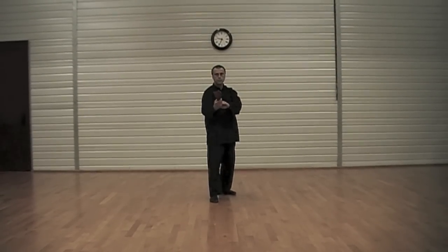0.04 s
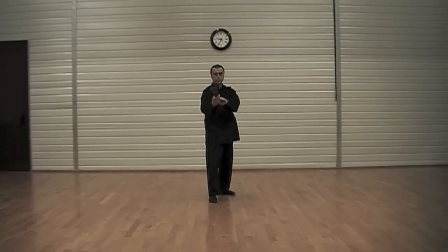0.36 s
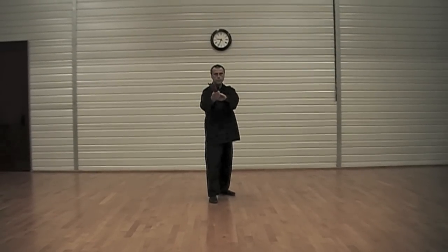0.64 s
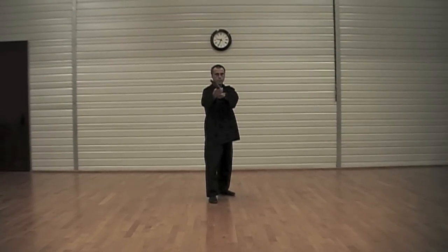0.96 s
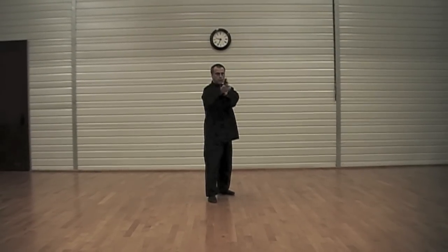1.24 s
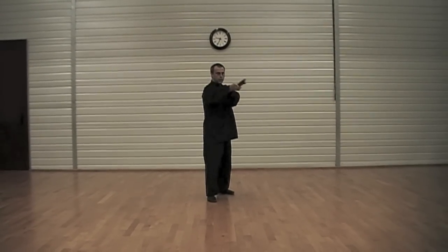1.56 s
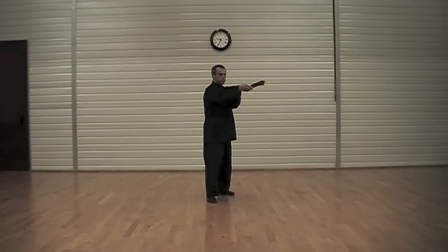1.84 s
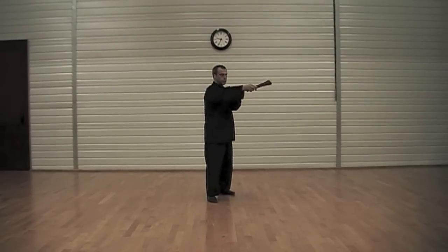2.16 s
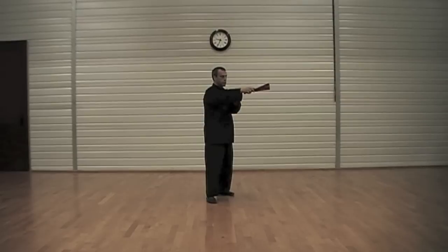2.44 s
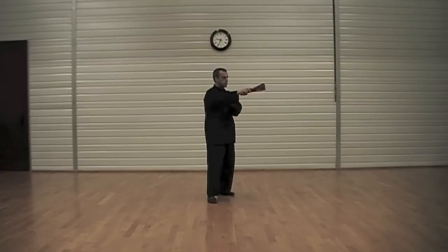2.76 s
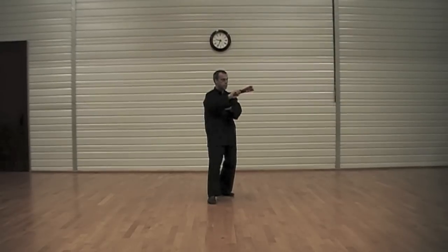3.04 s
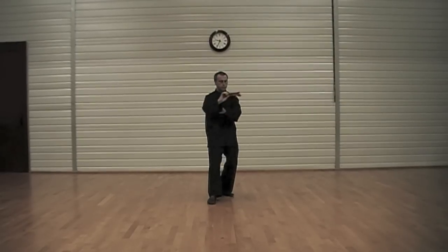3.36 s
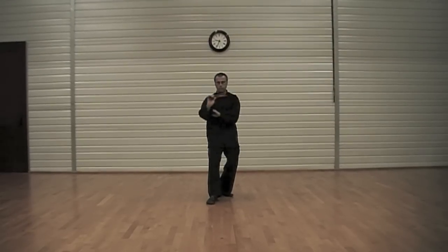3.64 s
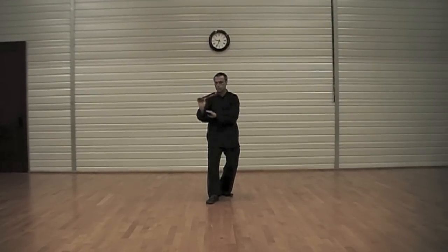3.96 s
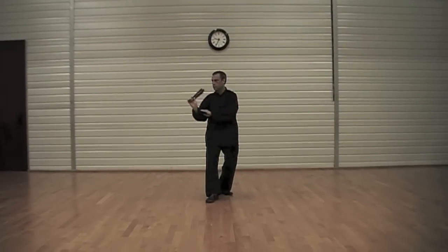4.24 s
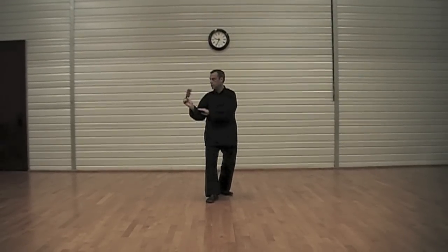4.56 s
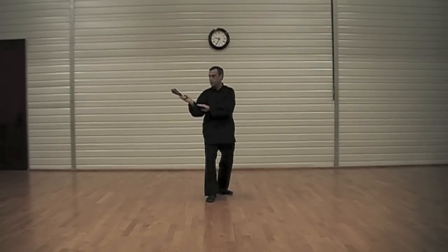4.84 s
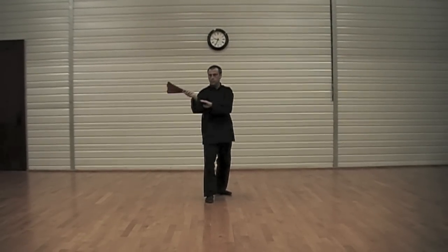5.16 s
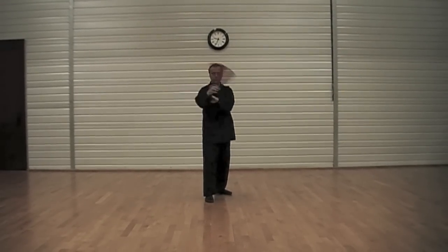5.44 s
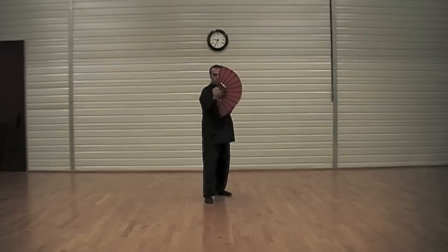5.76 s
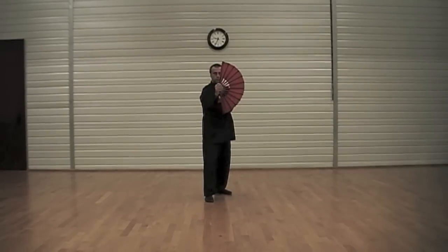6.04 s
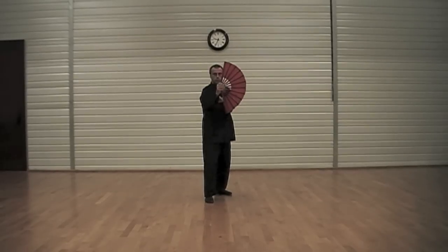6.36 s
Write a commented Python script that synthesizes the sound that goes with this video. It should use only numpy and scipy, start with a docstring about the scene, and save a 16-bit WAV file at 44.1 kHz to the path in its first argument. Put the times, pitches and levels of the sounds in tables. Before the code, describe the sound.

Over steady hiss, faint cloth movement and bamboo rib ticks lead to one loud fan snap that rings through a large hall.

```python
"""A large, quiet sports hall: hiss and a camera's faint whine, then soft steps and swishing sleeves.
A folded cloth fan is swung, its bamboo ribs ticking and sliding. At about 5.6 s it is flicked open:
the pleats jerk taut one after another in under a tenth of a second, the ribs crack, and the sheet
pushes a low puff of air. Gain control ducks under the crack, so the echo swells up afterwards
as the hall rings on."""
import sys
import numpy as np
from scipy import signal
from scipy.fft import rfft, irfft
from scipy.io import wavfile
from scipy.ndimage import uniform_filter1d, minimum_filter1d

SR = 44100
rng = np.random.default_rng(int(sys.argv[2]) if len(sys.argv) > 2 else 0)


def unload_wav(signal):
    """Save mono or channel-first audio to the path in sys.argv[1] as 16-bit WAV at rate SR, clipped to [-1, 1]."""
    wavfile.write(
        sys.argv[1],
        SR,
        np.round(np.clip(np.atleast_2d(signal).T, -1, 1) * 32767).astype(np.int16),
    )


N = 282681


def from_db(db):
    return 10 ** (np.asarray(db) / 20)


def at_hz(points, hz):
    """Read a curve on a log-frequency axis."""
    table = np.array(points)
    return np.interp(np.log(hz + 1e-9), np.log(table[:, 0]), table[:, 1])


def butter(x, hz, kind, order):
    return signal.sosfilt(signal.butter(order, min(hz, SR / 2 - 1), kind, fs=SR, output="sos"), x + 1e-18)


def noise(spectrum):
    """Coloured noise of rms 1."""
    colour = from_db(at_hz(spectrum, np.fft.rfftfreq(N, 1 / SR)))
    x = irfft(rfft(rng.standard_normal(N)) * colour, N)
    return x / x.std()


def stereo_noise(spectrum, likeness, size):
    """Spectra of two noises that are alike to a degree set by frequency."""
    hz = np.fft.rfftfreq(size, 1 / SR)
    alike = at_hz(likeness, hz)
    mid, side = rfft(rng.standard_normal((2, size))) * from_db(at_hz(spectrum, hz))
    return hz, np.sqrt(1 + alike) * mid + np.sqrt(1 - alike) * side * [[1], [-1]], alike


def clicks(times, levels_db):
    """One impulse for each contact."""
    out = np.zeros(N)
    out[np.round(np.asarray(times) * SR).astype(int)] = from_db(levels_db)
    return out


def fading(hits, t60):
    """Every hit starts an envelope that falls 60 dB in t60 seconds."""
    return signal.lfilter([1], [1, -np.exp(-np.log(1000) / (t60 * SR))], hits + 1e-18)


def ring(hits, modes):
    """Every hit rings a body's damped modes; neighbouring modes start in opposite directions."""
    t = np.arange(SR // 20) / SR
    body = sum((-1) ** k * from_db(db - 60 * t / t60) * np.sin(2 * np.pi * hz * t)
               for k, (hz, db, t60) in enumerate(modes))
    return signal.oaconvolve(hits, body)[:N]


def swell(start, end, attack_s, release_s, edge_db):
    """Attack, hold from start to end, release; each slope covers edge_db in its time."""
    t = np.arange(N) / SR
    away = np.maximum(start - t, 0) / attack_s + np.maximum(t - end, 0) / release_s
    return from_db(np.maximum(-edge_db * away, -200))


def swinging(moves, attack_share=.35):
    """Envelope of a series of movements, each speeding up to its peak and slowing down."""
    return sum(from_db(db) * swell(s, s, attack_share * length, (1 - attack_share) * length, edge_db=21.5)
               for s, db, length in moves)


# The colour of the noise bed. Each row: frequency in Hz, relative density in dB.
HISS_COLOUR = [(20, -49), (40, -6), (75, -9), (130, -6), (200, 1.5), (300, -2.5), (700, 1.5), (1500, -2.5),
               (2200, -3.5), (3000, -6.5), (5500, -9.5), (7500, -9.5), (11000, -16), (15500, -27)]
# Its stereo image. Each row: frequency in Hz, left-right likeness from -1 to 1.
HISS_IMAGE = [(60, 0.66), (180, -0.45), (500, -0.77), (1600, -0.56), (3000, -0.11), (4500, 0.061),
              (7500, 0.49), (10000, -0.14), (15000, 0.24)]


def hiss(level_db):
    """A wide, steady hiss; the camera body shakes its two microphones against each other."""
    _, field, alike = stereo_noise(HISS_COLOUR, HISS_IMAGE, N)
    bed = irfft(field / np.sqrt(1 + alike), N)
    return from_db(level_db) * bed / bed.std() * from_db([[-.4], [.4]])


# Hum and motor tones. Each row: frequency in Hz, level in dB, the left side's phase lead in radians.
WHINE_TONES = [(99.3, -82.5, 0.94), (206, -83, 1.15), (728, -82, 1.36), (2187.4, -73, 0.86),
               (2950, -89, 2.1), (3645.6, -82.5, 1.8), (7870, -96, 4), (10600, -98, 1)]


def whine():
    """Mains hum and the camera's motor hold thin tones, a little to the right."""
    t = np.arange(N) / SR
    tones = sum(np.sqrt(2) * from_db(db) * np.sin(2 * np.pi * hz * t + np.array([[lead], [0]]))
                for hz, db, lead in WHINE_TONES)
    return tones * from_db([[-1.8], [1.2]])


# The colour of the reverb. Each row: frequency in Hz, relative level in dB.
TAIL_COLOUR = [(60, -21), (150, -14.5), (360, 3), (470, -5.5), (650, -5), (1000, 1.5), (2500, 2.5),
               (5000, 1), (9000, 5.5), (14000, 5)]
# Its stereo image. Each row: frequency in Hz, left-right likeness from -1 to 1.
TAIL_IMAGE = [(100, 0.9), (700, 0.95), (2000, 0.8), (4000, 0.67), (5500, 0.95), (8000, 0.56),
              (10000, -0.053), (15000, -0.95)]
# Its decay. Each row: frequency in Hz, t60 in seconds.
TAIL_DECAY = [(100, 1.3), (350, 1.17), (600, 1.445), (1200, 1.208), (2500, 0.92), (5000, 0.97),
              (8000, 0.72), (12000, 0.65)]
# Pitches of the fan's quick pleat run, emphasised in its echo.
# Each row: frequency in Hz, bandwidth in Hz, gain in dB.
SNAP_PITCHES = [(365, 16, 0), (548, 18, -4), (591, 20, -1), (796, 26, 6), (1113, 28, -4), (1238, 18, -1),
                (1385, 18, -4)]


def hall(x, echo_db=-46.0, predelay_s=0.0019, build_s=0.096):
    """The hall answers with a diffuse tail that builds up, then dies fastest in the treble."""
    t = np.arange(SR) / SR
    hz, field, _ = stereo_noise(TAIL_COLOUR, TAIL_IMAGE, len(t))
    half_octave = np.round(2 * np.log2(np.maximum(hz, 64)))
    tail = sum(irfft(field * (half_octave == k)) * from_db(-60 * t / at_hz(TAIL_DECAY, 2 ** (k / 2)))
               for k in np.unique(half_octave))
    tail *= 1 - np.exp(-np.maximum(t - predelay_s, 0) / build_s)
    pitches = sum(from_db(db) * signal.lfilter(*signal.iirpeak(f, f / width, fs=SR), x)
                  for f, width, db in SNAP_PITCHES)
    return from_db(echo_db) * signal.fftconvolve((x + pitches)[None], tail, axes=1)[:, :N]


# Early reflections. Each row: delay in seconds, gain in dB.
REFLECTIONS = [(.0235, -13), (0.061, -23), (.135, -19.5)]


def wall_returns(sideways):
    """Ceiling and walls each send back the sound thrown their way, later and softer."""
    n = np.arange(N)
    return sum(from_db(db) * np.interp(n - delay_s * SR, n, x, left=0)
               for x, (delay_s, db) in zip(sideways, REFLECTIONS))


# Footfalls. Each row: start in seconds, centre frequency in Hz, level in dB, t60 in seconds.
FOOTFALLS = [(.239, 460, -60, .1), (2.639, 1800, -67, .3), (4.799, 140, -67, .45)]


def steps():
    """Soft shoes give short, dull scuffs and knocks on the wooden floor."""
    out = np.zeros(N)
    for s, hz, db, t60 in FOOTFALLS:
        scuff = noise([(hz / 4, -25), (hz, 0), (hz * 4, -25), (hz * 20, -60)])
        out += fading(clicks([s], [db]), t60) * scuff
    return out


# Sleeve swishes. Each row: peak time in seconds, level in dB, length in seconds.
SWISHES = [(1.43, -74, 0.82), (2.95, -71, 2.1), (4.1, -72, 0.86)]
# Their soft colour. Each row: frequency in Hz, relative density in dB.
SWISH_COLOUR = [(100, -26), (350, -9), (650, -2.5), (1100, -7), (2200, -18), (8000, -35)]


def sleeves():
    """Cloth brushes on cloth as the body turns."""
    return swinging(SWISHES) * noise(SWISH_COLOUR)


# The cue for the flick: the first pleat moves, and the pull builds until the cloth is taut.
FIRST_PLEAT_S, PULL_ATTACK_S = 5.6298, .016
TAUT_S = FIRST_PLEAT_S + PULL_ATTACK_S

# The low whump under the snap. Each row: frequency in Hz, relative density in dB.
PUFF_COLOUR = [(10, -25), (28, -2), (70, 3), (130, 1), (210, 5), (400, -18), (1000, -45), (4000, -90)]


def air_puff(level_db=-26.5):
    """The opening sheet gives one push of air, strongest when the cloth first comes taut."""
    push = swell(TAUT_S, TAUT_S, attack_s=0.018, release_s=0.14, edge_db=56)
    return from_db(level_db) * push * noise(PUFF_COLOUR)


# Rib ticks, the light ones thinner. Each row: start in seconds, level in dB, low cut in Hz.
RIB_TICKS = [(.664, -60, 3800), (1.677, -64, 3000), (3.024, -59, 5000), (4.69, -63, 4970),
             (5.182, -53.5, 5540), (5.377, -50, 4970), (5.543, -52, 5420), (5.603, -43, 2140),
             (5.6198, -23.5, 1650)]
# Arm swings that slide the ribs. Each row: peak time in seconds, level in dB, length in seconds.
ARM_SWINGS = [(1.667, -70.5, 0.2), (2.66, -69, 0.17), (4.1, -75, 2.9), (5.117, -66, 0.76),
              (5.586, -63, 0.11)]
# The bright rasp of rib on rib. Each row: frequency in Hz, relative density in dB.
FRICTION_COLOUR = [(100, -20), (500, -10), (1500, 1), (4000, -4), (5500, -3), (7200, 1.5), (9500, -5),
                   (12000, -17), (15500, -37)]


def fan_handling(tick_t60=0.027, grain_db=3, spread_db=-17.5):
    """The folded ribs tick, slide with every swing of the arm, and rub hard as the fan spreads."""
    pleat_s, _, _ = pleat_run()
    spreading = from_db(spread_db) * swell(TAUT_S, pleat_s[-1], attack_s=.053, release_s=.02, edge_db=109)
    friction = noise(FRICTION_COLOUR)
    ticks = sum(butter(fading(clicks([s], [db]), tick_t60) * friction, hz, "high", order=2)
                for s, db, hz in RIB_TICKS)
    catching = butter(rng.standard_normal(N), 280, "low", order=2)   # the ribs catch and slip
    grain = from_db(grain_db * catching / catching.std())
    return ticks + (swinging(ARM_SWINGS) + spreading) * grain * friction


# Accents: the nearest rib stops harder than the rest. Each row: time in seconds, boost in dB.
RIB_ACCENTS = [(5.647, 10.5), (5.668, 5), (5.692, 11.5), (5.698, 4)]


def pleat_run(count=11, first_gap_s=.00822, gap_shrink_s=.000293, slap_db=4.5, crack_db=4):
    """The pleats jerk taut in a quickening run; gives each one's time, cloth level and rib level."""
    k = np.arange(count)
    elapsed = k * first_gap_s - gap_shrink_s * k * (k - 1) / 2
    pleat_s = FIRST_PLEAT_S + elapsed
    pull_db = -34.5 * np.maximum(1 - (elapsed / PULL_ATTACK_S) ** 2, 0)   # the pull builds up
    fade_db = -14 * np.maximum(2 * elapsed / elapsed[-1] - 1, 0) ** 2   # the last pleats slap weakly
    rib_db = crack_db + pull_db
    for when, boost_db in RIB_ACCENTS:
        rib_db[np.abs(pleat_s - when).argmin()] += boost_db
    return pleat_s, slap_db + pull_db + fade_db, rib_db


# Taut cloth, the body of the snap. Each row: frequency in Hz, relative level in dB, t60 in seconds.
CLOTH_MODES = [(599, -5.5, 0.02), (832, -6, 0.015), (1160, -2.5, 0.0071), (1976, -8, 0.0091)]
# Bamboo ribs, its hard edge. Each row: frequency in Hz, relative level in dB, t60 in seconds.
BAMBOO_MODES = [(1555, -0.5, 0.0016), (2190, -2.5, 0.0033), (3210, -2.5, 0.0014), (5560, -7, 0.0016),
                (6620, -7.5, 0.0014), (8480, -6.5, 0.00093), (11900, -22.5, 0.0013)]


def fan_snap(scatter_s, rebound_s=.00135, rebound_db=0.5, flutter_db=-29, chatter_db=-19):
    """Each pleat slaps taut and flutters, and stops its rib with a crack and a brief chatter."""
    pleat_s, cloth_db, rib_db = pleat_run()
    count = len(pleat_s)
    pleat_s = pleat_s + scatter_s * rng.standard_normal(count)   # the paths differ with direction
    again_s = pleat_s + rebound_s * (1 + .07 * rng.standard_normal(count))   # each pleat rebounds once
    slaps = clicks(pleat_s, cloth_db) + clicks(again_s, cloth_db + rebound_db)
    cracks = clicks(pleat_s, rib_db) + clicks(again_s, rib_db + rebound_db)
    flutter = from_db(flutter_db) * fading(slaps, t60=.035) * rng.standard_normal(N)
    chatter = from_db(chatter_db) * fading(cracks, t60=.01) * rng.standard_normal(N)
    snap = ring(slaps + flutter, CLOTH_MODES) + ring(cracks + chatter, BAMBOO_MODES)
    snap = butter(snap, 340, "high", order=2)   # an open sheet radiates little bass
    return butter(snap, 14500, "low", order=4)


def scene():
    """The fan is heard directly; what it throws in other directions comes back from the hall."""
    movement = fan_handling() + steps() + sleeves() + air_puff()
    direct = fan_snap(scatter_s=0) + movement
    sideways = [fan_snap(scatter_s=.00012) + movement for _ in REFLECTIONS]
    heard = direct + wall_returns(sideways) + sum(hall(x) for x in sideways)
    tilt = 0.12 * butter(heard, 2100, "low", order=1) * [[-1], [1]]   # a little more bass on the right
    return heard + tilt + hiss(level_db=-60) + whine()


def gain_control(x, ceiling_db, release_s, window_samples=45):
    """Gain ducks just ahead of a peak over the ceiling and creeps back."""
    over_db = np.maximum(20 * np.log10(np.abs(x).max(axis=0) + 1e-9) - ceiling_db, 0)
    release = np.exp(-np.arange(N) / SR / release_s)
    gain_db = -np.maximum.accumulate(over_db / release) * release
    early_db = minimum_filter1d(gain_db, window_samples)
    return x * from_db(uniform_filter1d(early_db, window_samples))


def record(dry):
    """Gain control holds down the crack, then a steep low-pass takes off the very top."""
    held = gain_control(from_db(0.5) * dry, ceiling_db=-.7, release_s=0.11)
    cutoff_hz = 15700
    return signal.sosfilt(signal.ellip(10, .1, 90, cutoff_hz, fs=SR, output="sos"), held)


dry = scene()
out = record(dry)
unload_wav(out)
```